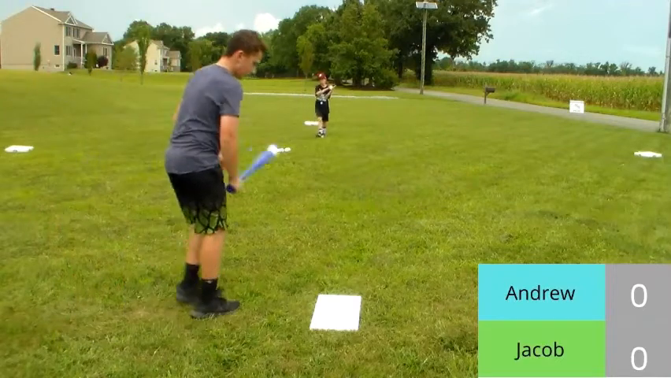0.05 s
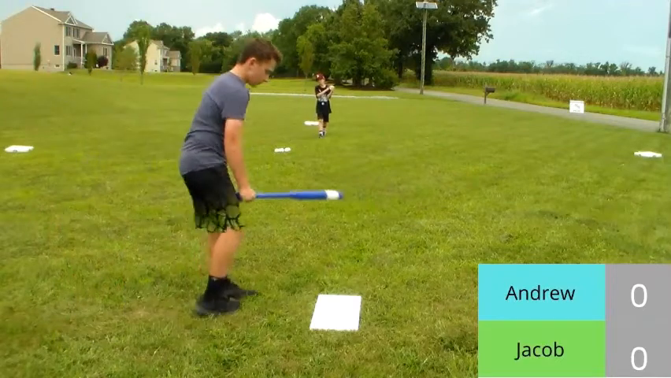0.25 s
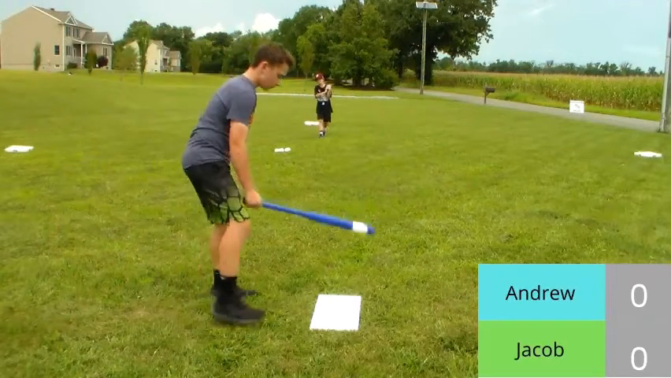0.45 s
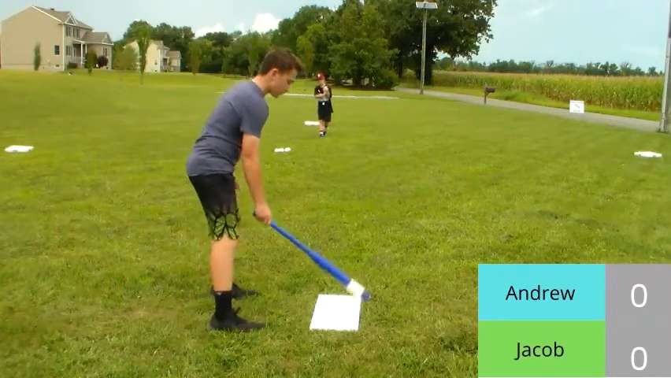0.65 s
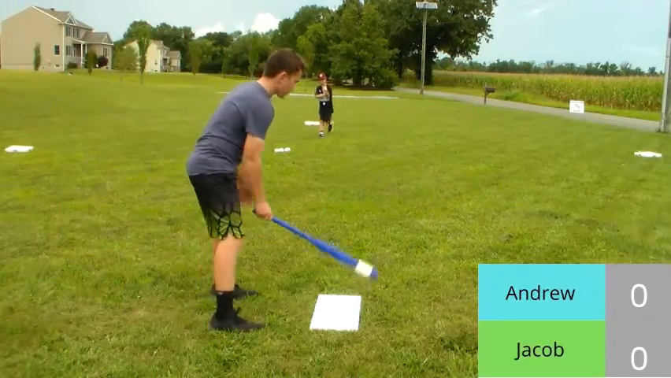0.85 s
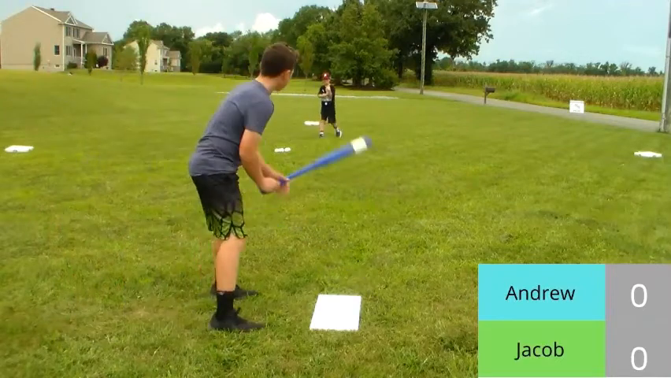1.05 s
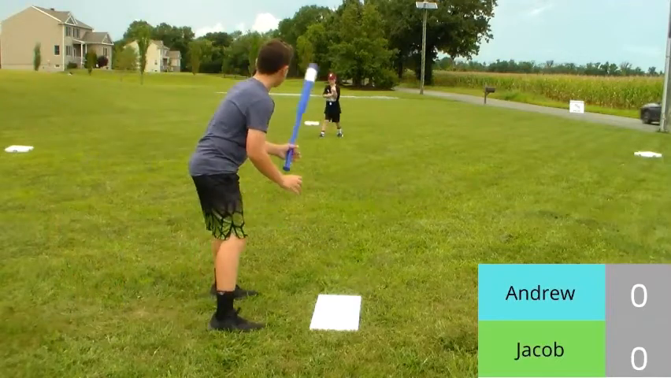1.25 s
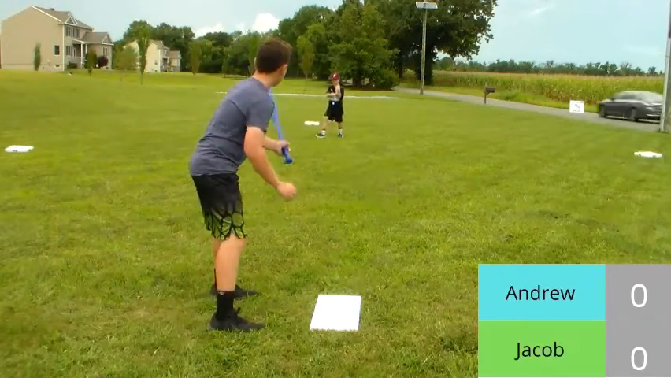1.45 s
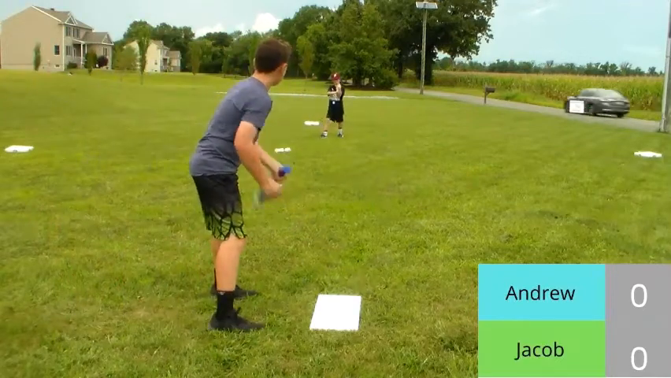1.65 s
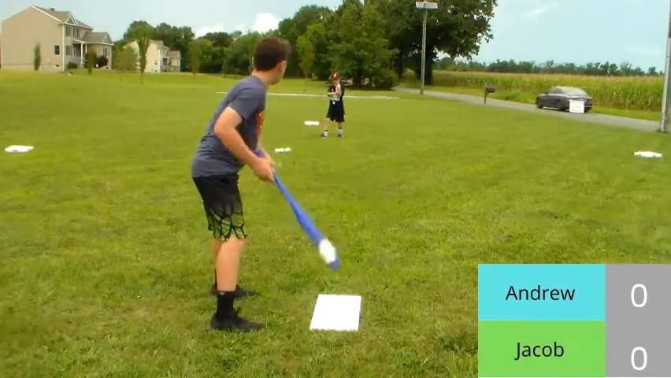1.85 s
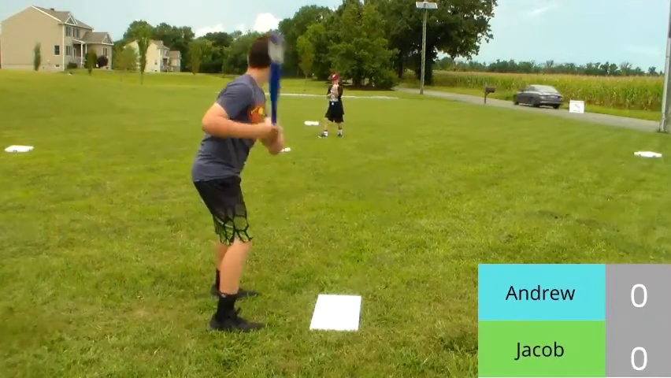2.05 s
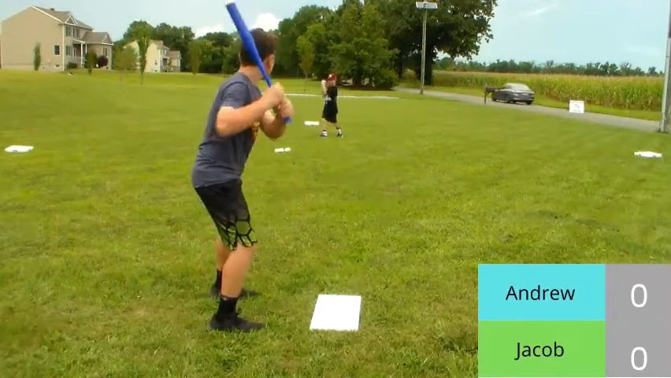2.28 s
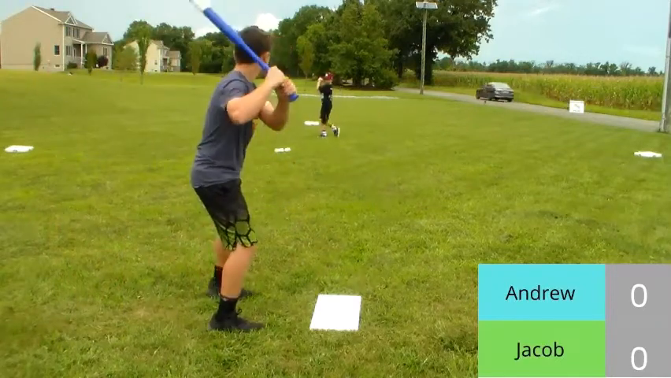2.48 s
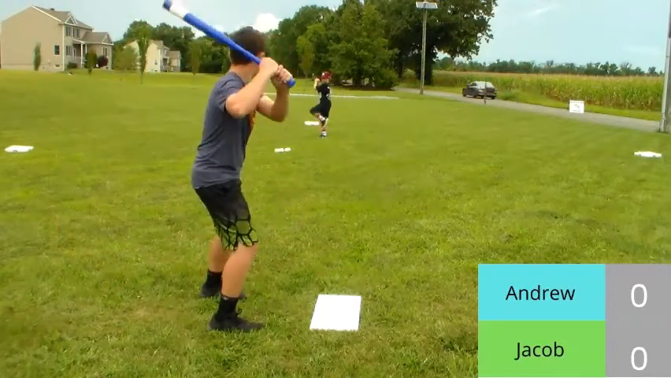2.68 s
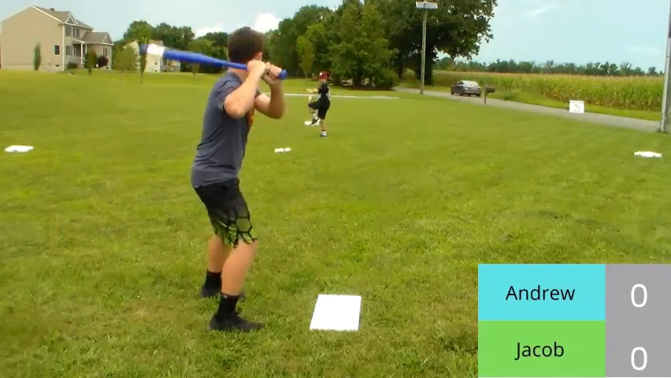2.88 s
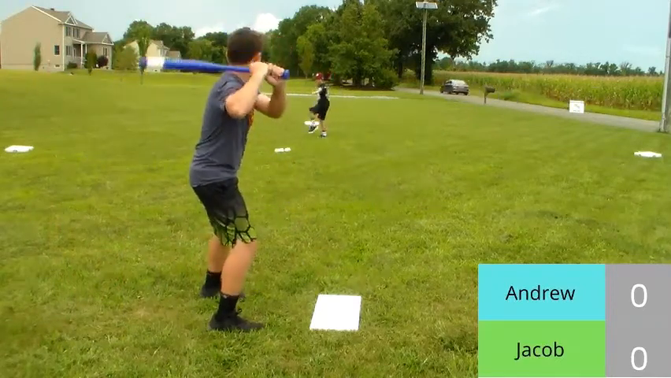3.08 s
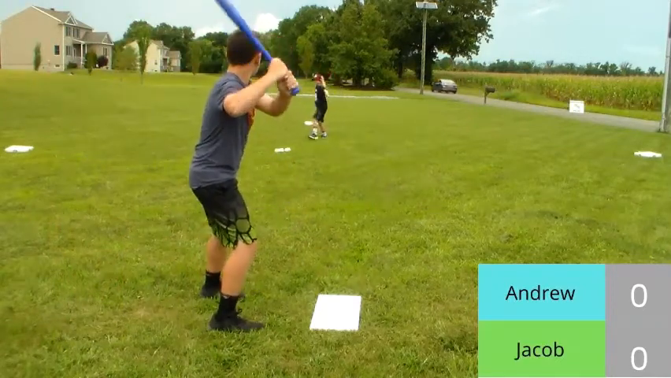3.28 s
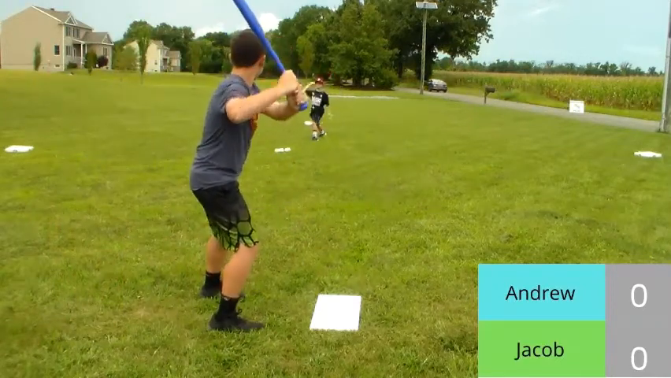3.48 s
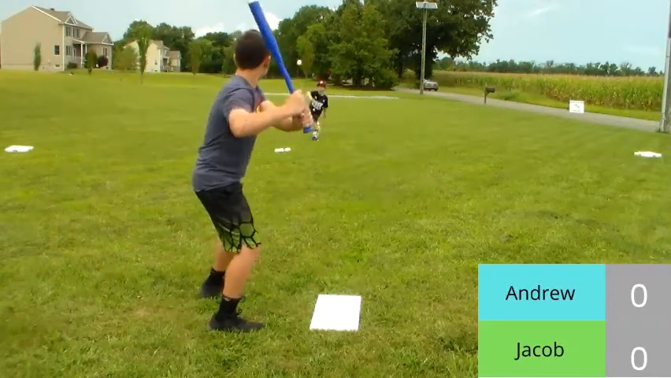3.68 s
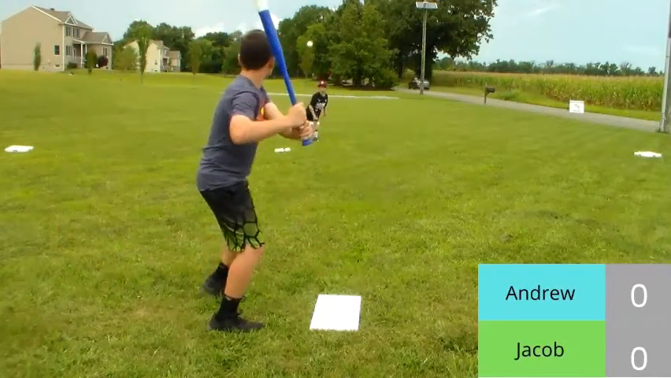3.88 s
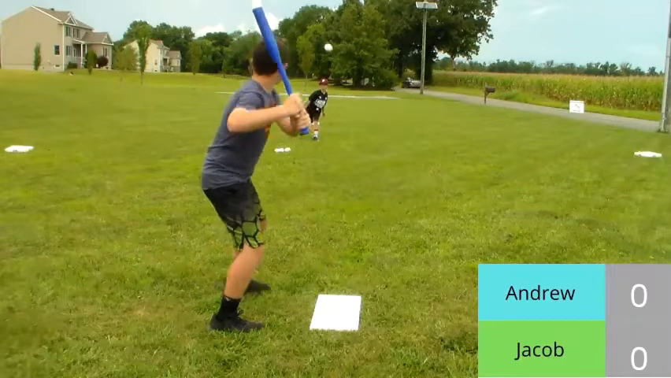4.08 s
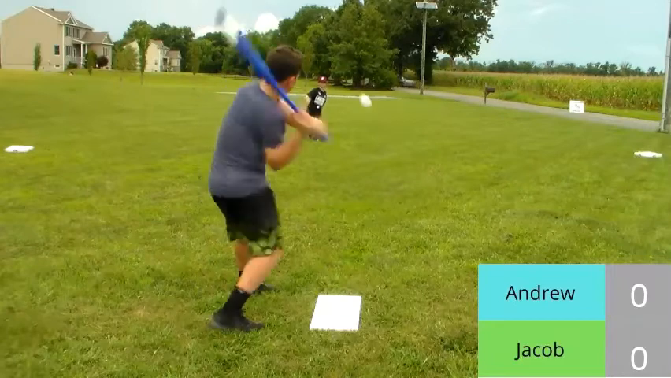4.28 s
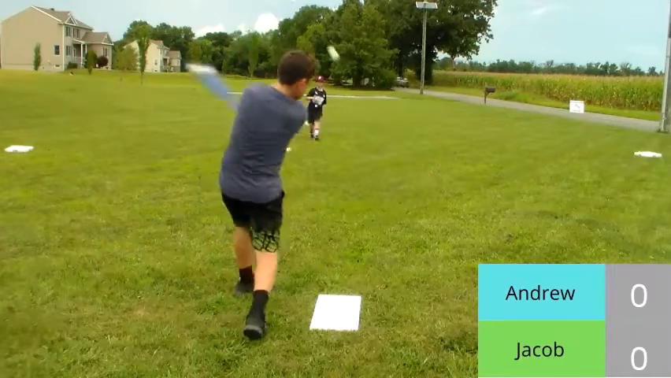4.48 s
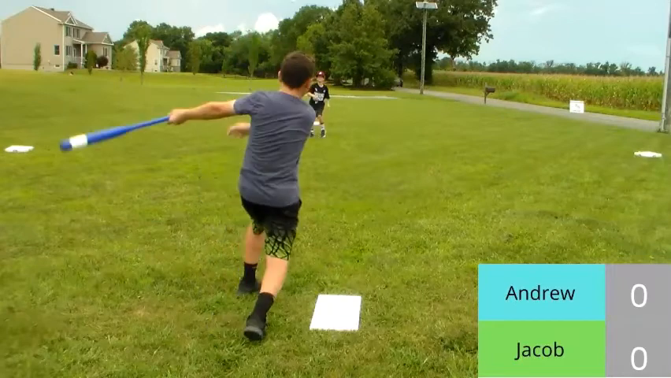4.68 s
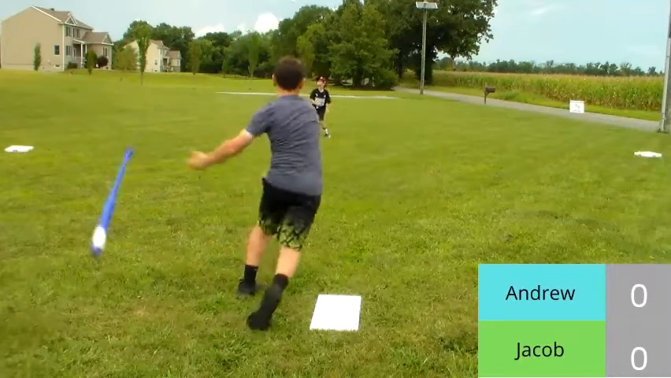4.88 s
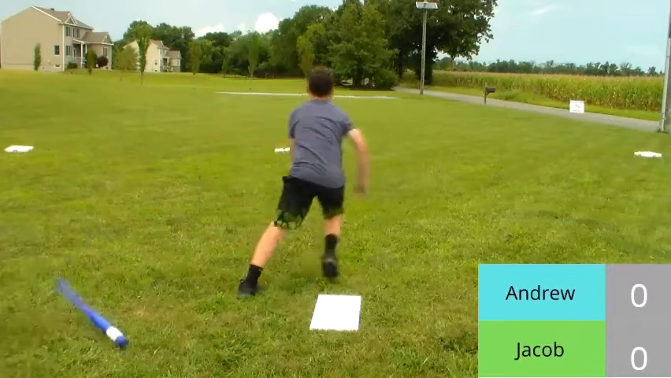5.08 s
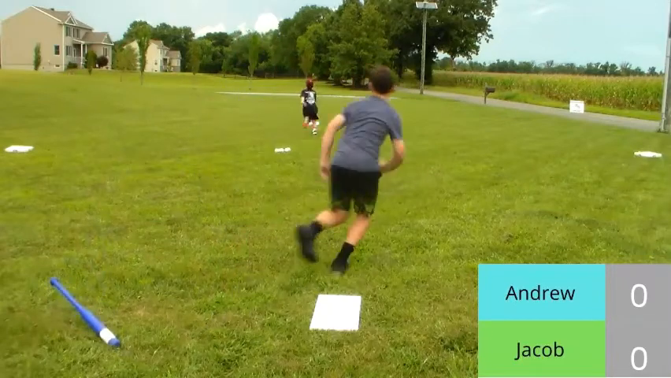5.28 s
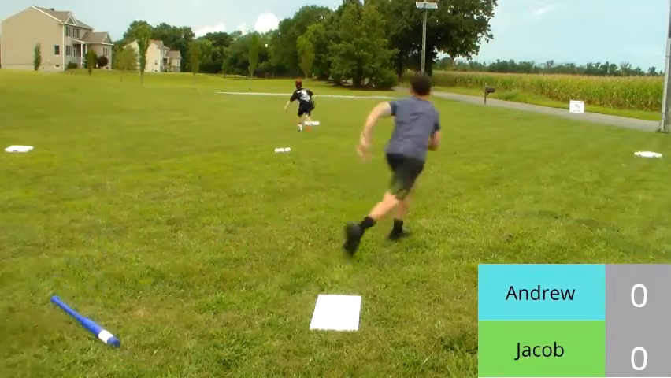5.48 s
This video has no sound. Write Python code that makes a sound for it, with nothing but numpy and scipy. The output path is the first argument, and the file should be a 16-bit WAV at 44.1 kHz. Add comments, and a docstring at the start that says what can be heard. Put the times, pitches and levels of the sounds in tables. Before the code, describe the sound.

An open field, with crickets and a katydid that start softly and grow to a steady, high chirping within two seconds. A breeze rumbles on the microphone throughout, mostly on the left, with dull low thumps near 0.5, 1 and 3.3 seconds. At about 0.9 seconds a hollow plastic bat taps home plate close by and rings briefly; the background steps down with it. A car, audible from the start, passes nearest at about 1.7 seconds, its tyres roaring and its engine hum sinking in pitch before it fades away. At 4.5 seconds the bat strikes a light plastic ball with a sharp crack, by far the loudest sound. Everything drops in level for about half a second, then recovers. Faint grass crackles and a few soft footfalls follow until about 5.5 seconds as the batter drops the bat and runs.

```python
"""Crickets and a katydid scrape their wings round a field while a breeze buffets the microphone.
Just before 1 s a batter taps a hollow plastic bat on home plate, and the bat rings briefly.
A car passes on the road, nearest at 1.7 s: its tyres roar and its engine hum sinks in pitch.
At 4.5 s the bat cracks a light plastic ball. This overloads the recorder, which cuts its gain for
about half a second. The grass crackles as the batter drops the bat and runs off."""
import sys
import numpy as np
from scipy import signal
from scipy.fft import rfft, irfft
from scipy.io import wavfile
from scipy.ndimage import uniform_filter1d

SR = 44100
rng = np.random.default_rng(int(sys.argv[2]) if len(sys.argv) > 2 else 0)


def master(y):
    """Save y as 16-bit WAV."""
    cut = np.clip(np.atleast_2d(y).T, -1, 1)
    pcm = np.round(cut * 32767)  # scale
    wavfile.write(sys.argv[1], SR, pcm.astype(np.int16))


N = 244480
TIME = np.arange(N) / SR
BINS = np.fft.rfftfreq(1024, 1 / SR)  # frequencies at which noise is shaped [Hz]
FRAMES = np.arange(N // 256 + 5) * 256 / SR  # moments at which noise is shaped [s]


def amp(db):
    """Turns decibels into a number to multiply a sound by."""
    return 10 ** (np.asarray(db) / 20)


def unit(x):
    """Scales a sound to an average strength (rms) of 1."""
    return x / np.sqrt(np.mean(x ** 2) + 1e-20)


def spectrum(points, hz):
    """Reads between the rows of a frequency table, with octaves evenly spaced."""
    frequencies, values = np.transpose(points)
    return np.interp(np.log(hz + 1), np.log(frequencies + 1), values)


def curve(rows):
    """Joins the rows of a time table with straight lines."""
    return np.interp(TIME, *np.transpose(rows))


def add(mix, start_s, sound):
    """Mixes a sound in at the given time."""
    part = mix[..., round(start_s * SR):][..., :sound.shape[-1]]
    part += sound[..., :part.shape[-1]]


def drift(rate_hz):
    """A smooth random wobble, up to about the given rate."""
    t = np.arange(2 ** 14) * 16 / SR
    keep_slow = np.exp(-(np.fft.rfftfreq(len(t), t[1]) / rate_hz) ** 2)
    slow = irfft(rfft(rng.standard_normal(len(t))) * keep_slow)
    return unit(np.interp(TIME, t, slow))


def noise(colour_db, likeness, patchy_db):
    """Stereo noise with louder and softer patches; a likeness of 1 makes left and right equal."""
    a, b, c, d, patches = rng.standard_normal((5, len(FRAMES), len(BINS)))
    patches = unit(uniform_filter1d(uniform_filter1d(patches, size=10, axis=0), size=10, axis=1))
    likeness = np.clip(likeness, -1, 1)
    left = a + 1j * b
    right = likeness * left + np.sqrt(1 - likeness ** 2) * (c + 1j * d)
    shaped = np.array([left, right]) * amp(colour_db + patchy_db * patches)
    return unit(signal.istft(shaped.swapaxes(1, 2), nperseg=1024, noverlap=768)[1][:, :N])


def click(colour):
    """A sudden click with the given tone colour (its mix of lows and highs) and a peak of 1."""
    log_gain = np.log(amp(spectrum(colour, abs(np.fft.fftfreq(4096, 1 / SR)))))
    pulse = np.fft.ifft(np.exp(np.conj(signal.hilbert(log_gain)))).real[:len(log_gain) // 2]
    return pulse / abs(pulse).max()


def slow_air():
    """Slow air keeps up a deep, even rumble between the gusts."""
    bass = signal.butter(2, [18, 70], "band", fs=SR, output="sos")
    deep = signal.sosfilt(bass, rng.standard_normal((3, N)))
    return amp(-43.5) * unit(deep[0] + 0.55 * deep[1:]) * amp([[1.5], [-1.5]])


# tone colour of distant insects and air: (frequency [Hz], relative level [dB])
CHORUS_COLOUR = [(200, -8), (2500, -17), (3900, -0.5), (5200, -4.5), (5950, -4), (6400, 4.5), (7000, 4),
                 (7600, -4), (8300, -5.5), (8900, -2.5), (9800, -7), (14000, -6), (14500, -43.5)]


def far_chorus():
    """Many distant insects blur into one hiss."""
    return amp(-55.5) * noise(spectrum(CHORUS_COLOUR, BINS), likeness=0.044, patchy_db=1.4)


def wings(hz, strokes_hz, unsteady, glide_hz, arch_hz, sharp, fuzz_hz, likeness):
    """Each wing stroke draws ridges over a scraper: a short, bending tone, blurred by distance."""
    stroke = np.cumsum(strokes_hz * (1 + unsteady * drift(rate_hz=4.7))) / SR % 1
    pulse = abs(np.sin(np.pi * stroke))
    pitch_hz = hz + glide_hz * (stroke - .5) + arch_hz * (pulse - 1)
    phase = 2 * np.pi * np.cumsum(pitch_hz) / SR
    left, other = (drift(fuzz_hz) * np.cos(phase) + drift(fuzz_hz) * np.sin(phase) for _ in range(2))
    right = likeness * left + np.sqrt(1 - likeness ** 2) * other
    return unit(np.array([left, right]) * pulse ** sharp)


def chirping(turn, period_s, dip_db):
    """Makes a song rise and fall once each period; turn (0 to 1) says where it is loudest."""
    beats = np.cumsum(np.ones(N) / period_s) / SR - turn
    return amp(-dip_db * np.sin(np.pi * beats) ** 2)


def insects():
    """Rubbing their wings, two crickets chirp in turn and a katydid buzzes, under an even high trill."""
    low = wings(hz=4460, strokes_hz=25.03, unsteady=0.06, glide_hz=-300, arch_hz=59.2,
                sharp=0.82, fuzz_hz=130, likeness=0.56)
    high = wings(hz=4660, strokes_hz=20.5, unsteady=0.066, glide_hz=-300, arch_hz=79.8,
                 sharp=1.0, fuzz_hz=150, likeness=0.13)
    period_s = .33 + .045 * TIME  # the crickets' rhythm slowly drags
    crickets = high * chirping(turn=.97, period_s=period_s, dip_db=12)
    crickets += low * chirping(turn=.17, period_s=period_s, dip_db=12)
    buzz = wings(hz=6420, strokes_hz=50.0, unsteady=0.25, glide_hz=-66, arch_hz=40,
                 sharp=0.25, fuzz_hz=130, likeness=0.075)
    katydid = buzz * chirping(turn=.11, period_s=.315, dip_db=10)
    singers = amp(-58.5) * crickets * amp([[-1], [-4]]) + amp(-57.5) * katydid
    swell = amp(-10 * np.clip(1 - TIME / 1.8, 0, 1))  # they start softly and grow to full voice
    trill = wings(hz=7900, strokes_hz=18.15, unsteady=.006, glide_hz=-80, arch_hz=1000,
                  sharp=1.8, fuzz_hz=140, likeness=0)
    return swell * singers + amp(-70) * trill


# thumps of feet and air: (time [s], relative level [dB], pitch [Hz])
THUMPS = [(.289, -36, 72), (.461, -19.5, 70.6), (1.042, -24.5, 105), (3.25, -26.5, 81), (3.833, -34, 75),
          (4.454, -29, 80), (5.213, -27, 69.4), (5.274, -29, 72), (5.43, -27, 78)]


def thumps():
    """Feet and puffs of air make dull thumps, each a low tone that swells and dies quickly."""
    out, t = np.zeros(N), np.arange(SR // 8) / SR
    swell = t / 0.0067
    for start_s, db, hz in THUMPS:
        add(out, start_s, amp(db) * swell * np.exp(1 - swell) * np.sin(2 * np.pi * hz * t))
    return out


# tone colour of the breeze: (frequency [Hz], relative level [dB])
WIND_COLOUR = [(15, -18), (30, -6), (55, -2), (78, 1), (100, -5), (160, -9), (220, -14), (300, -24),
               (600, -50), (2000, -90)]
# strength of the gusts: (time [s], relative level [dB])
GUSTS = [(0, -32.5), (.3, -27), (.52, -32), (.78, -33.5), (.88, -45), (1.1, -37.5), (1.9, -48),
         (2.85, -40.5), (3.07, -50), (3.25, -31), (3.47, -50), (3.64, -36), (3.95, -34.5), (4.3, -47.5),
         (5.15, -39.5), (5.24, -29.5), (5.54, -45)]
# which side the breeze hits harder: (time [s], left minus right [dB])
WIND_SIDE = [(0, 1), (.7, 11), (1.1, 11.5), (1.8, -1), (2.3, -2.5), (3.2, 18), (3.8, 18), (4.4, 15),
             (5.4, 13)]


def breeze():
    """Gusts rumble on the microphone; they and the thumps are mostly stronger on the left."""
    rumble = noise(spectrum(WIND_COLOUR, BINS), likeness=0.82, patchy_db=1.5)
    rumble *= amp(curve(GUSTS) - 2.0 + 1.2 * drift(rate_hz=8.7))
    left_db = curve(WIND_SIDE)
    sides = amp([left_db / 2, -left_db / 2])
    return (rumble + thumps()) * sides / sides.mean(axis=0)


# tone colour of the tyres at four stages of the drive: (frequency [Hz], relative level [dB])
ROAR_COMING = [(76, -40.5), (130, -14), (178, -5.5), (215, -1), (318, -8.5), (455, -7.5), (936, -7.5),
               (1080, -12), (1410, -12), (2590, -21), (3180, -26.5), (4560, -31.5), (5500, -41),
               (7150, -72.5), (12100, -120)]
ROAR_PASSING = [(76, -34), (130, -7), (215, -1), (247, -3), (338, -14), (455, -14), (550, -11), (788, -17),
                (981, -10.5), (1670, -11.5), (2470, -22), (3550, -26.5), (4210, -31.5), (4560, -32.5),
                (5500, -44), (7150, -74), (12100, -120)]
ROAR_LEAVING = [(76, -35.5), (130, -6.5), (183, -3.5), (221, 2.5), (381, -11), (522, -6), (629, -14.5),
                (666, -12.5), (716, -12.5), (940, -7.5), (1230, -7.5), (1770, -12), (2100, -23),
                (3570, -25), (4000, -34), (5200, -44), (8800, -120)]
ROAR_FAR = [(76, -36), (130, -1), (178, -19.5), (218, -4.5), (355, -20), (421, -11.5), (577, -19.5),
            (612, -17.5), (737, -19), (1050, -17), (1510, -15.5), (2460, -28.5), (3050, -30), (3780, -34.5),
            (4000, -38), (5200, -59), (8800, -120)]
# when each stage is reached: (time [s])
ROAR_TIMES = [.5, 1.2, 2.6, 3.599]
# how alike left and right are, with the car to one side and ahead: (frequency [Hz], likeness [0-1])
LIKENESS_COMING = [(100, 0.7), (300, 1), (640, 0.92), (1400, 0.77), (3100, 0.48), (6000, 0)]
LIKENESS_AHEAD = [(100, 0.96), (300, 1), (640, .97), (1400, 0.98), (3100, 0.88), (6000, 0.28)]
# strength of the roar: (time [s], relative level [dB])
ROAR_LEVEL = [(0, -36), (.8, -36.5), (2.7, -41.5), (3.7, -43.5), (4.4, -42.5), (5.54, -45.5)]


def tyres():
    """Tyres roar on the road, and the roar changes colour as the car goes by."""
    colours = np.array([spectrum(c, BINS) for c in (ROAR_COMING, ROAR_PASSING, ROAR_LEAVING, ROAR_FAR)])
    colours -= 10 * np.log10(np.sum(amp(colours) ** 2, axis=1, keepdims=True))  # equal power for each
    blend = np.transpose([np.interp(FRAMES, ROAR_TIMES, stage) for stage in np.eye(len(colours))])
    coming = blend[:, :1]
    likeness = coming * spectrum(LIKENESS_COMING, BINS) + (1 - coming) * spectrum(LIKENESS_AHEAD, BINS)
    roar = noise(blend @ colours, likeness, patchy_db=1.36) * amp([[-.4], [.4]])
    return amp(curve(ROAR_LEVEL)) * roar


def engine():
    """The rough hum sinks in pitch as the car passes (the Doppler effect) and fades as it leaves."""
    nearest_s, speed_m_per_s, road_distance_m = 1.7, 18, 12.7
    rest_hz, sound_m_per_s, front_boost_db = 205.2, 343, 14
    along_m = speed_m_per_s * (TIME - nearest_s)
    distance_m = np.hypot(along_m, road_distance_m)
    leaving = along_m / distance_m  # -1 is straight towards us, +1 straight away
    pitch_hz = rest_hz / (1 + leaving * speed_m_per_s / sound_m_per_s)
    pitch_hz *= 1 + 0.04 * drift(rate_hz=20.6)
    hum = np.sin(2 * np.pi * np.cumsum(pitch_hz) / SR) * (1 + 0.71 * drift(rate_hz=68))
    return amp(-50.5 - front_boost_db * leaving) * road_distance_m / distance_m * unit(hum)


# scuffs of shoes and bat in the grass: (time [s], level [dB], fade time [s])
SCUFFS = [(4.57, -33, 0.0061), (4.631, -35.5, 0.013), (4.753, -39, 0.017), (5.113, -44, .008),
          (5.16, -46, 0.01), (5.169, -42.5, .0094), (5.26, -42.5, 0.016), (5.331, -49.5, .025),
          (5.346, -60.5, .0036)]
# tone colour of crackling grass: (frequency [Hz], relative level [dB])
GRASS_COLOUR = [(200, -5), (1500, 1.5), (3800, -1), (8000, -14), (13500, -11), (15000, -31)]


def grass_scuffs():
    """Grass blades crackle in short grainy bursts under the shoes and the dropped bat."""
    out, t = np.zeros((2, N)), np.arange(SR // 5) / SR
    blade = click(GRASS_COLOUR)[None]
    for start_s, db, fade_s in SCUFFS:
        grains = rng.standard_normal((3, len(t))) * amp(6.7 * rng.standard_normal(len(t)))
        crackle = unit(signal.fftconvolve(grains[0] + .5 * grains[1:], blade, axes=1)[:, :len(t)])
        add(out, start_s, amp(db) * crackle * np.exp(-t / fade_s) * (1 - np.exp(-t / 0.00085)))
    return out


def strike(colour, tones, click_db, ring_db, shell_db, shell_s, echo_s, echo_db):
    """A hard hit sets the hollow plastic ringing; the lawn returns a dull echo."""
    t = np.arange(SR // 4) / SR
    dull = signal.butter(3, 4700, fs=SR)
    ring = sum(amp(db - 60 * t / fade_s) * np.cos(2 * np.pi * hz * t) for hz, db, fade_s in tones)
    sound = amp(ring_db) * ring * (1 - np.exp(-t / 0.00018))  # the ring builds while the two touch
    # as the shell bends, it carries the highs ahead of the lows
    pulse = signal.lfilter([-.58, 1], [1, -.58], click(colour))
    add(sound, 0, amp(click_db) * pulse)
    # the thin shell has countless short tones, too close to tell apart
    shell = signal.lfilter(*dull, rng.choice([-1., 1.], len(t))) * amp(-60 * t / shell_s)
    add(sound, 0, amp(shell_db) * signal.fftconvolve(shell, pulse / np.linalg.norm(pulse)))
    add(sound, echo_s, amp(echo_db) * signal.lfilter(*dull, sound))
    # so small a body gives off hardly any bass
    return signal.lfilter(*signal.butter(4, 445, "high", fs=SR), sound)


# click of the bat on the plate and on the ball: (frequency [Hz], relative level [dB])
PLATE_CLICK = [(100, -3), (900, 0), (2500, -15), (4500, -9.5), (6200, -19), (7800, -20), (10000, -26),
               (15000, -31)]
BALL_CLICK = [(100, -20), (600, -3), (1330, 3), (2270, 1), (4470, -4), (5900, -6), (6900, 0), (8600, -6),
              (10200, -3), (12400, -6.5), (14100, -7), (16000, -26)]
# tones that ring after each hit: (pitch [Hz], relative level [dB], time to fade by 60 dB [s])
PLATE_TONES = [(520, -24, 0.078), (710, -20.5, 0.03), (870, -16.5, 0.037), (990, -37, 0.03),
               (1398, -13, 0.025), (1490, -36, 0.043), (2200, -19.5, 0.017), (2514, -22, 0.021),
               (3160, -36, 0.025)]
BALL_TONES = [(560, -18, .02), (690, -19, .016), (1095, -18, .018), (1262, -20, .018), (1735, -18, .016),
              (2275, -30, .014), (2550, -28, .016), (3030, -24, .018), (3260, -20, .02), (3470, -25, .02),
              (3727, -21, .02), (4200, -27, .02), (4360, -28, .02), (4835, -28, .018)]


def bat():
    """The bat taps the plate, then cracks the ball; the field scatters a little sound back."""
    hits = np.zeros(N)
    tap = strike(PLATE_CLICK, PLATE_TONES, click_db=-21, ring_db=0.5,
                 shell_db=-33, shell_s=0.026, echo_s=0.00294, echo_db=-9)
    crack = strike(BALL_CLICK, BALL_TONES, click_db=5, ring_db=2.5,
                   shell_db=-21, shell_s=0.052, echo_s=0.0059, echo_db=-22)
    add(hits, .8575, tap)
    add(hits, 4.5331, crack)
    t = np.arange(SR // 2) / SR
    scatter = signal.lfilter(*signal.butter(1, 3500, fs=SR), rng.standard_normal((2, len(t))))
    scatter *= amp(-60 * t / 0.17)
    echoes = signal.fftconvolve(hits[None], scatter / np.linalg.norm(scatter[0]), axes=1)[:, :N]
    late_s = .000012  # the hits are a little to the right, so they reach the left side later
    left = irfft(rfft(hits) * np.exp(-2j * np.pi * np.fft.rfftfreq(N, 1 / SR) * late_s), N)
    return np.array([left, hits]) * amp([[-.3], [.3]]) + amp(-32) * echoes


# the car and the insects step down together in the first second: (time [s], level change [dB])
BACKGROUND_STEPS = [(0, 9), (.46, 9.5), (.48, 6), (.858, 6.5), (.87, 0), (4.6, -0.5), (5.3, 1.5), (5.54, 2)]


def scene():
    """The field with its car, insects and breeze, and the batter close by."""
    background = amp(curve(BACKGROUND_STEPS)) * (tyres() + engine() + insects() + far_chorus())
    return background + breeze() + slow_air() + bat() + grass_scuffs()


def overload_guard(x, threshold, cut_db, attack_s, hold_s, release_s):
    """A very loud peak makes the recorder turn itself down, wait, and come back up."""
    overloaded = abs(x).max(axis=0) > threshold
    since_s = TIME - np.maximum.accumulate(np.where(overloaded, TIME, -np.inf))
    cut = (1 - amp(-cut_db)) * np.clip(1 - (since_s - hold_s) / release_s, 0, 1)
    smoothing = np.exp(-1 / (attack_s * SR))
    return x * (1 - signal.lfilter([1 - smoothing], [1, -smoothing], cut))


def record(dry):
    """The recorder guards against overload, adds hiss, clips peaks and drops the highest treble."""
    hiss_colour = spectrum([(100, -4), (4000, -6), (13800, -12), (14500, -40.5)], BINS)
    hiss = amp(-70) * noise(hiss_colour, likeness=0.31, patchy_db=-1.0)
    guarded = overload_guard(dry, threshold=.6, cut_db=24.5, attack_s=0.0096, hold_s=0.42, release_s=0.4)
    treble_cut = signal.firwin(255, 14800, window=("kaiser", 8), fs=SR)
    return signal.oaconvolve(np.clip(guarded + hiss, -1, 1), treble_cut[None], "same")


dry = scene()
out = record(dry)
master(out)
```